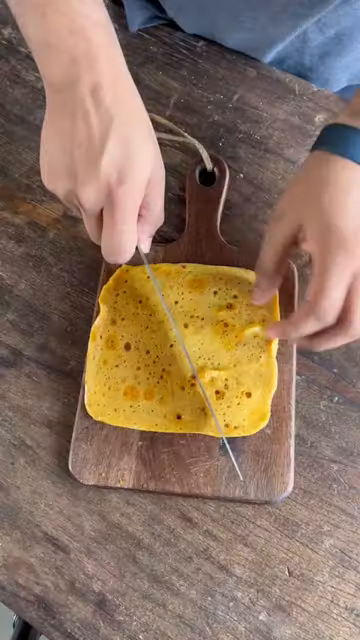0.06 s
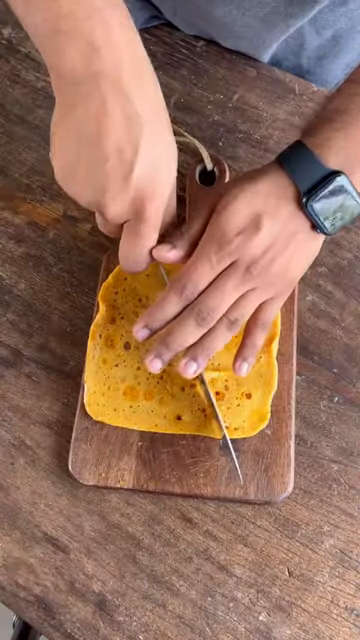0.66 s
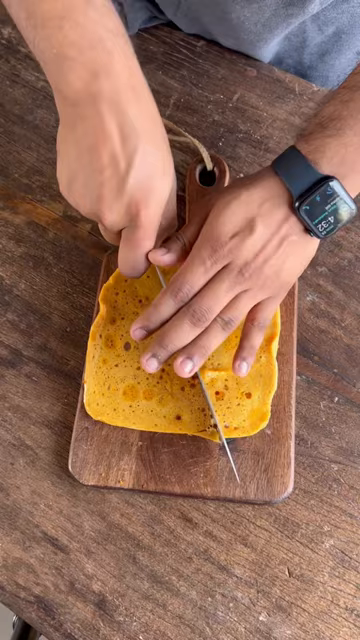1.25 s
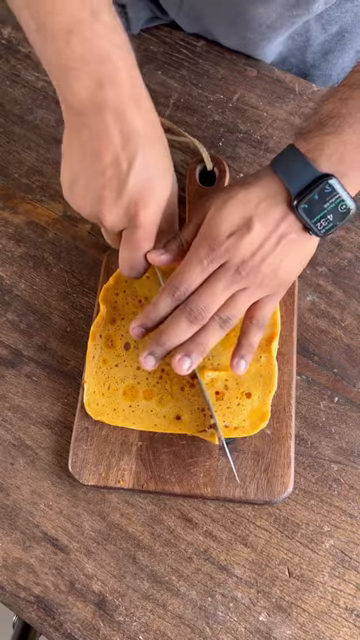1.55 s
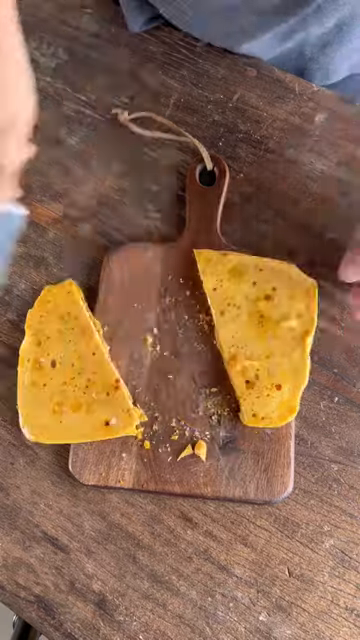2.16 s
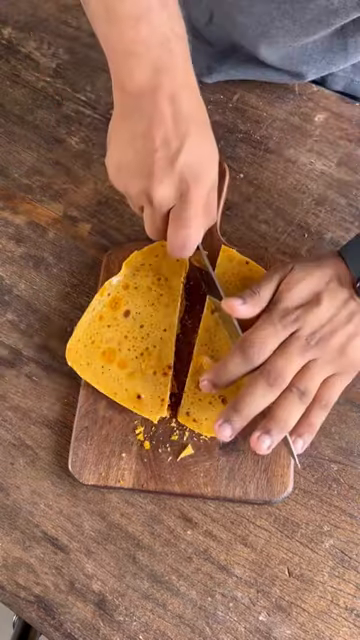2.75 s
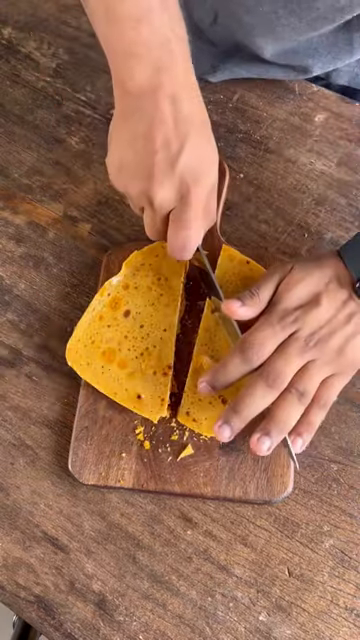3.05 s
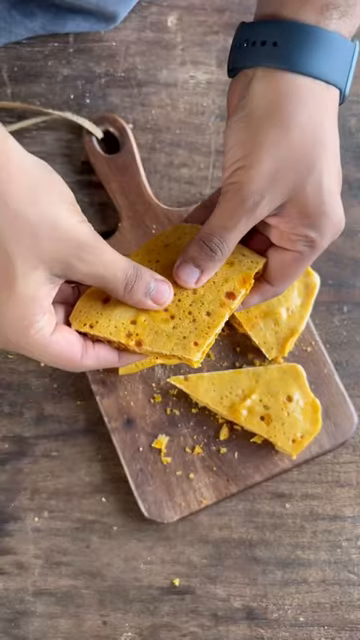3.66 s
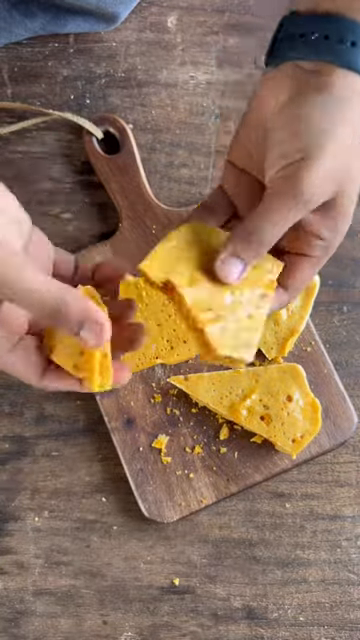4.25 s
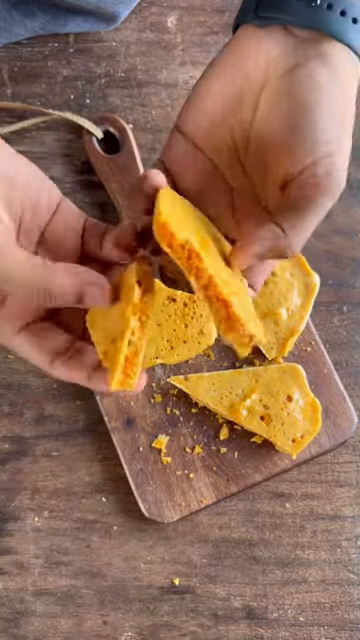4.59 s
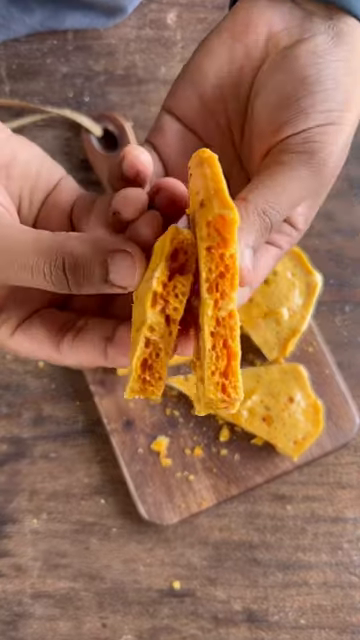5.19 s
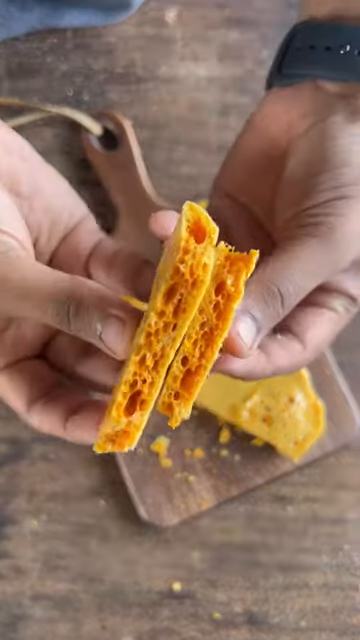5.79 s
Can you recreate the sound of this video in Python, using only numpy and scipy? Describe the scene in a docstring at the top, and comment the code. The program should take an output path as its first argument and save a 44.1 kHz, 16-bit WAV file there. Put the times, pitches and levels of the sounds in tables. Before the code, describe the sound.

A knife presses into brittle honeycomb toffee on a wooden board, making dry, crackly crunches and dull thuds that build to a sharp crack and a short skid of shards. After a few light scrapes, a second, quicker cut crunches and cracks. Then fingers snap a piece with a smaller, crisp sound and softly handle it. Everything is heard close up in a small kitchen over faint hiss.

```python
"""Honeycomb toffee crunches under a knife on a wooden board, then a piece is snapped by hand.
Sugar cells collapse in avalanches of tiny clicks that ring the slab; it grinds under load, cracks,
and sends shards skidding, with light scrapes and clinks in between. Each push thuds through board
and table. Underneath sit a low rumble of hands and a faint hiss, all heard close up in a small
kitchen, with a wide top end."""
import sys
import numpy as np
from scipy import signal
from scipy.fft import rfft, irfft, next_fast_len
from scipy.io import wavfile
from scipy.ndimage import uniform_filter1d

SR = 44100
rng = np.random.default_rng(int(sys.argv[2]) if len(sys.argv) > 2 else 0)


def to_wav(sig):
    """Store sig (one row per channel, or 1-D mono) as 16-bit WAV at the path in sys.argv[1].

    Samples outside -1..1 are clipped; the rate is SR.
    """
    pcm = np.clip(np.atleast_2d(sig), -1, 1) * 32767
    pcm = np.round(pcm).astype(np.int16)
    wavfile.write(sys.argv[1], SR, pcm.T)  # frames by channels


N = 265923
TIME = np.arange(N) / SR
LEFT_RIGHT = np.array([[1], [-1]])  # opposite signs on the two channels

# the big bursts of collapsing cells: (peak time [s], swell [s], level [dB])
CRUNCHES = [(0.691, 0.0038, -45), (0.735, .006, -52), (0.917, 0.0046, -45), (0.946, 0.0082, -44.5),
            (0.984, 0.015, -42), (1.121, 0.0076, -46.5), (1.184, .012, -53.5), (1.279, 0.016, -38),
            (1.32, 0.011, -48), (1.398, .012, -47), (1.461, 0.012, -37.5), (1.519, 0.0058, -45.5),
            (1.602, 0.0048, -44.5), (1.621, 0.0091, -41), (1.639, 0.014, -35.5), (1.72, 0.012, -41),
            (1.755, 0.0052, -32.5), (2.616, 0.0034, -51), (2.636, 0.0063, -40.5), (2.681, 0.013, -41),
            (2.722, 0.0097, -43), (2.752, 0.0047, -29.5), (2.771, 0.0061, -38.5), (2.821, 0.0052, -43.5),
            (2.918, .005, -33), (2.935, 0.012, -30), (2.968, 0.0079, -28), (3.022, 0.0071, -30),
            (3.067, 0.0046, -35.5), (3.548, 0.0039, -56), (3.622, 0.002, -65), (3.679, 0.0027, -72.5),
            (3.737, .004, -76), (3.767, 0.003, -58.5), (3.827, 0.0025, -71.5)]
# cracks through the slab; hollow, crisp, ring and thump are set against the crack's mids:
# (peak time [s], swell [s], level [dB], hollow [dB], crisp [dB], ring [Hz], ring [dB], thump [dB])
SNAPS = [(0.595, 0.0032, -28.5, -8.5, -2.5, 1840, -27, -31),
         (.999, 0.0036, -27.5, -11, -4.5, 507, -3.5, -2.5),
         (1.773, 0.0023, -14.5, -0.5, -10, 867, -8.5, -3), (3.101, 0.0026, -15, -8, -14.5, 1398, -9, -22.5),
         (3.946, 0.0029, -28.5, -6.5, -1, 1475, -17.5, -7)]
# a piece under stress, twice beneath the knife and once between the fingers:
# (start [s], end [s], grind at start [dB], grind at end [dB], hollow [dB], crisp [dB])
LOADS = [(0.601, 1.77, -61, -53.5, -3.5, 1), (2.597, 3.09, -60.5, -53, -4, -3.5),
         (3.54, 3.94, -83, -85.5, -10.5, 15.5)]
# freed shards sliding: (start [s], length [s], level [dB], fade [dB], crisp [dB])
SKIDS = [(0.605, 0.17, -60.5, 13, 16.5), (1.006, 0.16, -40, 23, -2), (1.785, .18, -34, 26, -30.5),
         (3.107, .085, -33.5, 13.5, -18.5), (3.196, 0.12, -49, 2, -12)]
# blade or pieces graze the sugar: (peak time [s], swell [s], level [dB], crisp [dB])
BRUSHES = [(0.065, 0.0038, -46, -15), (0.25, 0.0027, -61, -2), (0.339, 0.0092, -45.5, -1),
           (0.51, 0.034, -60.5, -1), (0.848, 0.0074, -52.5, -10), (2.303, 0.0039, -36, -13),
           (2.416, 0.0072, -54.5, -9), (2.49, 0.0037, -37.5, -7), (2.546, 0.016, -52, -5.5),
           (3.43, 0.0024, -69.5, 14), (4.114, 0.013, -54, 4), (4.15, .006, -59.5, 4),
           (4.31, .011, -67.5, 7.5), (4.624, 0.0026, -63, 2.5), (5.07, 0.02, -67.5, -15),
           (5.73, .002, -62.5, -5)]
# blade or shard touches a piece: (time [s], level [dB], pitch [Hz], t60 [s])
CLINKS = [(2.302, -49, 2905, 0.29), (5.108, -52, 2890, 0.028)]
# resonances of slab and blade: (frequency [Hz], sharpness [Q], level [dB])
SLAB_MODES = [(800, 10, -5), (928, 29, -3.5), (1144, 13, -1), (1450, 5.6, -10), (1669, 4.3, -0.5),
              (2373, 4.2, -6), (2720, 36, -1.5), (3250, 40, -4.5), (3830, 26, -4.5), (4120, 30, -3),
              (5710, 61, 2), (6310, 8, -2.5), (7300, 18, -8)]
# tone of breaking sugar: (frequency [Hz], gain [dB])
SUGAR_EQ = [(250, 0.5), (700, -4.5), (2500, 0), (4000, -6.5), (5000, -3.5), (5600, -8), (8000, -9),
            (10000, -13.5), (11900, -9), (12700, -37), (16000, -41)]
# blade or hand loads the board: (time [s], level [dB], hardness as upper-mode boost [dB])
KNOCKS = [(0.059, -40, 5), (0.352, -41, -2), (0.597, -45.5, 16), (0.845, -46.5, -4.5), (0.998, -28, -4),
          (1.047, -35, -9), (1.12, -41.5, 0), (1.272, -33, -16.5), (1.388, -45.5, -2), (1.456, -39, -1.5),
          (1.475, -34, -6), (1.615, -40.5, 0), (1.72, -36, -2), (1.77, -27, 1), (2.308, -39, -0.5),
          (2.674, -50.5, 10), (2.753, -38, 3), (2.919, -37, -5), (2.967, -32.5, 3.5), (3.017, -27.5, -9.5),
          (3.096, -34.5, 20), (3.943, -52.5, 7.5), (4.606, -46.5, -15), (4.673, -45.5, -27.5)]
# resonances of the board on the table: (frequency [Hz], level [dB], t60 [s])
TABLE_MODES = [(60, -19, 0.23), (103, -10.5, 0.15), (117, 2.5, 0.15), (162, -5, 0.32), (208, -5.5, 0.13),
               (242.6, -3.5, 0.15), (295, -11.5, 0.35), (353, -15, 0.09), (398, -15, 0.089),
               (554, -15.5, 0.14), (716, -19.5, 0.12)]
# partials of a faint hollow ring: (frequency [Hz], level [dB])
HOLLOW_PARTIALS = [(135, -60.5), (275, -69.5), (425, -66.5), (546, -63.5), (707, -72.5), (945, -84.5)]
# hands shift over the table: (peak time [s], swell [s], level [dB])
HAND_MOVES = [(0.3, 0.47, -58.5), (1.82, 0.088, -39.5), (2.45, 0.083, -55.5), (3.229, 0.075, -45),
              (4.05, 0.061, -50), (4.7, 0.12, -54), (5.09, 0.077, -54.5), (5.551, 0.052, -51),
              (6.0, 0.25, -58)]
# tone of the hand rumble: (frequency [Hz], gain [dB])
HAND_EQ = [(15, -46.5), (25, -14), (85, -2.5), (123, -8.5), (158, -7.5), (233, -10), (458, -20.5),
           (517, -32.5), (574, -39.5), (900, -47), (1170, -71), (1980, -120)]
# wall reflections by band: (low edge [Hz], high edge [Hz], level [dB], side against mid [dB])
KITCHEN_BANDS = [(191.4, 300, -8, -10.5), (396, 720, 0, -4), (720, 3100, -13, -4.5),
                 (3240, 9600, -11, -6.5)]
# left-right phase shift that widens the treble: (frequency [Hz], lead of the left [rad])
STEREO_PHASE = [(0, 0), (2800, 0), (4150, 0.8), (4900, -2), (5350, -6.5), (7300, -6), (9500, -8),
                (12500, -9.0)]
# level of the hiss over time: (time [s], level [dB])
HISS_LEVELS = [(0, -71.5), (1.7, -64.5), (2.0, -82), (2.28, -73), (3.3, -69.5), (3.4, -71), (4.5, -68.5),
               (6.03, -67)]
# tone of the centred hiss: (frequency [Hz], gain [dB])
HISS_EQ = [(290, -36), (500, -5.5), (873, -16.5), (976, -13.5), (1360, -16.5), (1640, -2.5), (1930, 1),
           (2070, -1.5), (2350, -14.5), (3020, -18.5), (3720, -16), (4220, -21), (5980, -21), (7790, -32.5),
           (14000, -47.5)]
# tone of the room noise that differs left and right: (frequency [Hz], gain [dB])
DIFFUSE_EQ = [(24, -44.5), (40, -13), (123, 0.5), (479, -4.5), (527, -4), (1400, -15), (3310, -10.5),
              (4000, -19), (7450, -34.5), (12000, -28), (15600, -56), (22000, -120)]
# thin tones in the hiss: (frequency [Hz], level against the hiss [dB])
WHINE_TONES = [(2622, -22), (3215, -18.5), (3429, -23), (3628, -23)]
# brief dips of the whole mix: (start [s], end [s], depth [dB])
DROPOUTS = [(2.279, 2.293, -21.5), (2.652, 2.666, -32), (3.319, 3.36, -26.5), (5.626, 5.638, -22)]


def crunches():
    """Cells cave in under blade or fingers; the nearest load sets how hollow and crisp they sound."""
    out = np.zeros(N)
    for time_s, swell_s, db in CRUNCHES:
        *_, hollow_db, crisp_db = min(LOADS, key=lambda load: abs(time_s - (load[0] + load[1]) / 2))
        sound, peak_s = burst(swell_s, db, hollow_db, crisp_db - dulling(db), crumble_db=-16)
        add(out, sound, time_s - peak_s)
    return out


def burst(swell_s, db, hollow_db, crisp_db, crumble_db, crumble_s=0.03):
    """One avalanche with a tail of trickling crumbs; returns the sound and its peak time."""
    envelope, peak_s = avalanche(swell_s, fall=1.0, size=12288, peak_sample=4096)
    since_peak = TIME[:len(envelope)] - peak_s
    crumbs = undb(crumble_db) * (since_peak > 0) * np.exp(-np.abs(since_peak) / crumble_s)
    envelope = np.maximum(envelope, crumbs)
    clicks = cells(envelope, per_s=2800, spread_db=-0.5)
    return undb(db) * slab(clicks, envelope, hollow_db, crisp_db), peak_s


def avalanche(swell_s, fall, size=8192, peak_sample=2048):
    """Each break sets off more until the stress is spent; returns the envelope and its peak time."""
    t = (np.arange(size) - peak_sample) / SR
    distance = t / (swell_s * np.where(t < 0, 1, fall))
    return np.exp(0.5 - np.hypot(distance, 0.5)), peak_sample / SR  # exponential flanks, rounded top


def cells(envelope, per_s, spread_db):
    """Sugar walls break at random moments, each a single click of its own strength."""
    breaks = rng.random(len(envelope)) < per_s / SR
    strength = undb(spread_db * np.minimum(rng.exponential(size=len(envelope)), 3))
    return envelope * breaks * strength * rng.choice([-1, 1], len(envelope))


def slab(clicks, envelope, hollow_db, crisp_db, direct_db=-1, walls_db=1, wall_q=28, wall_count=7):
    """Clicks ring the slab and nearby cell walls; hollow and crisp set lows and highs against mids."""
    min_width_hz = 55  # foamy sugar is well damped
    modes = sum(undb(db) * resonate(clicks, hz, max(hz / q, min_width_hz)) for hz, q, db in SLAB_MODES)
    # walls differ in size, so every break has its own few pitches
    wall_hz = 1000 * 2 ** ((np.arange(wall_count) + rng.random(wall_count)) / 2)
    walls = sum(resonate(clicks, hz, max(hz / wall_q, min_width_hz)) for hz in wall_hz)
    body = equalise(undb(direct_db) * clicks + modes + undb(walls_db) * walls, SUGAR_EQ)
    hollow = undb(hollow_db) * unit(band(body, 310, 1200))
    mids = unit(band(body, 1100, 3900))
    crisp = undb(crisp_db) * unit(band(body, 4700, 15000))
    return (hollow + mids + crisp) * rms(envelope)


def dulling(level_db, typical_db=-43, db_per_db=0.1819):
    """Crispness lost, in dB: a bigger burst breaks bigger walls and sounds darker."""
    return db_per_db * (level_db - typical_db)


def snaps(fizz_db=-29):
    """A crack races through the cells, stops short, jolts the board and rings the freed piece."""
    out = np.zeros(N)
    for time_s, swell_s, db, hollow_db, crisp_db, ring_hz, ring_db, thump_db in SNAPS:
        envelope, peak_s = avalanche(1.42 * swell_s, fall=0.88)
        clicks = whiten(cells(envelope, per_s=14000, spread_db=5.0))
        # a full break mostly radiates directly, and is sharp enough to fizz at the very top
        crack = slab(clicks, envelope, hollow_db, crisp_db, direct_db=5, walls_db=-8.5)
        fizz = undb(fizz_db) * unit(band(clicks, 14000, 16000))
        ring = undb(ring_db) * unit(resonate(resonate(clicks, ring_hz, 250), ring_hz, 690))
        thump = undb(thump_db) * unit(band(clicks, 110, 480))
        snap = crack + (ring + thump + fizz) * rms(envelope)
        add(out, undb(db + 2.5) * snap, time_s - peak_s)
    return out


def grinding(bursts_per_s=51, spread_db=3, steady_rasp=0.31, size=65536):
    """Under load, weak cells keep giving way: small random bursts over an even rasp."""
    out = np.zeros(N)
    grain, _ = avalanche(swell_s=0.0023, fall=1.3)
    for start_s, end_s, start_db, end_db, hollow_db, crisp_db in LOADS:
        triggers = (rng.random(size) < bursts_per_s / SR) * undb(spread_db * rng.standard_normal(size))
        flutter = unit(steady_rasp + unit(signal.fftconvolve(triggers, grain, mode="same")))
        envelope = flutter * load_ramp(start_s, end_s, start_db, end_db)[int(start_s * SR):][:size]
        clicks = cells(envelope, per_s=1200, spread_db=0.5)
        crisp_db -= dulling((start_db + end_db) / 2)
        add(out, slab(clicks, envelope, hollow_db, crisp_db), start_s)
    return out


def load_ramp(start_s, end_s, start_db, end_db):
    """Grind level of a stressed piece: a straight ramp in dB, cut off at the break."""
    return undb(np.interp(TIME, [start_s, end_s], [start_db, end_db])) * (TIME > start_s) * (TIME < end_s)


def skids(edge_s=0.0044, hollow_db=-0.5):
    """Rough shards catch and slip in a fading stream of tiny clicks."""
    out, t = np.zeros(N), TIME[:SR // 2]
    for start_s, length_s, db, fade_db, crisp_db in SKIDS:
        gate = np.clip(np.minimum(t, length_s - t) / edge_s + 0.5, 0, 1)
        envelope = undb(-fade_db * t / length_s) * gate
        clicks = cells(envelope, per_s=1200, spread_db=3.5)
        add(out, undb(db) * slab(clicks, envelope, hollow_db, crisp_db), start_s)
    return out


def brushes():
    """Short scrapes as the blade is placed and the pieces are turned over."""
    out = np.zeros(N)
    for time_s, swell_s, db, crisp_db in BRUSHES:
        hollow_db = -9 - 0.53 * crisp_db  # a duller touch sounds more hollow
        sound, peak_s = burst(swell_s, db, hollow_db, crisp_db, crumble_db=-15)
        add(out, sound, time_s - peak_s)
    return out


def clinks(spread=0.13, count=10):
    """A light touch on a piece rings a cluster of close modes."""
    out, t = np.zeros(N), TIME[:SR // 4]
    for time_s, db, hz, t60 in CLINKS:
        offsets = np.linspace(-1, 1, count) + rng.uniform(-1, 1, count) / count
        cluster_hz = hz * (1 + spread * offsets)
        modes = np.sin(2 * np.pi * cluster_hz[:, None] * t)
        ring = rng.choice([-1, 1], count) @ modes / np.sqrt(count / 2)
        add(out, undb(db) * ring * decay(t, t60), time_s)
    return out


def knocks(upper_from_hz=130, contact_s=0.0009, settle_s=0.0024, rebound_s=0.042, rebound_db=-8):
    """Each push thuds through board and table, then the board rocks back; hard contact is brighter."""
    out, t = np.zeros(N), TIME[:SR // 3, None]
    hz, mode_db, t60 = np.transpose(TABLE_MODES)
    upper = np.clip(np.log2(hz / upper_from_hz) * 2, 0, 1)  # 0 for table modes, 1 for board modes
    # the light board speaks at once, the heavy table has a slower attack
    attack_s = contact_s + settle_s * (1 - upper)
    envelope = (1 - np.exp(-t / attack_s)) * decay(t, t60)
    rebounds = [(time_s + rebound_s, db + rebound_db, hard_db) for time_s, db, hard_db in KNOCKS]
    for time_s, db, hard_db in KNOCKS + rebounds:
        # the hand's load shifts the board's modes, not the table's
        detune, level_jitter = rng.standard_normal((2, len(hz))) * upper
        gains = undb(mode_db + hard_db * upper + 1.5 * level_jitter)
        modes = gains * np.sin(2 * np.pi * hz * (1 + 0.031 * detune) * t)
        thud = (modes * envelope) @ rng.choice([-1, 1], len(hz))
        add(out, undb(db + 0.5) * thud / np.std(thud[:SR // 40]), time_s)
    return out


def hollow_ring(start_s=3.345, length_s=0.14):
    """A faint hollow ring swells and fades."""
    progress = np.clip((TIME - start_s) / length_s, 0, 1)
    partials = sum(undb(db) * wavering_tone(hz, depth=0.00603) for hz, db in HOLLOW_PARTIALS)
    return np.sin(np.pi * progress ** 0.5) * partials


def hands(resting_db=-65.5, above_grind_db=4, table_db=-2):
    """Hands rumble and set the table's main mode humming, louder as they press or shift."""
    rub = unit(equalise(rng.standard_normal(N), HAND_EQ))
    table_hum = undb(table_db) * unit(resonate(rub, hz=120, width_hz=6.7))
    pressing = undb(above_grind_db) * sum(load_ramp(*load[:4]) for load in LOADS)
    shifting = sum(undb(db) * np.exp(-((TIME - peak_s) / swell_s) ** 2 / 2)
                   for peak_s, swell_s, db in HAND_MOVES)
    return unit(rub + table_hum) * np.sqrt(undb(resting_db) ** 2 + pressing ** 2 + shifting ** 2)


def kitchen(send, t60_s=0.32, build_s=0.0016):
    """Short, dense stereo reverb off the walls, narrowest in the bass."""
    t = TIME[:SR // 2]
    mid, side = rng.standard_normal((2, len(t)))
    tail = decay(t, t60_s) * (1 - np.exp(-t / build_s))
    response = 0
    for lo_hz, hi_hz, db, side_db in KITCHEN_BANDS:
        noise = mid + undb(side_db) * side * LEFT_RIGHT
        response += undb(db) * band(noise * tail, lo_hz, hi_hz) / np.linalg.norm(tail)
    return signal.fftconvolve(send[None], response, axes=1)[:, :N]


def hiss(diffuse_db=-5.5):
    """A bed of thin hiss with a faint whine in the centre and diffuse room noise at the sides."""
    mid = unit(equalise(rng.standard_normal(N), HISS_EQ))
    side = undb(diffuse_db) * unit(equalise(rng.standard_normal(N), DIFFUSE_EQ))
    whine = sum(undb(db) * wavering_tone(hz, depth=0.002) for hz, db in WHINE_TONES)
    hiss_level = undb(np.interp(TIME, *np.transpose(HISS_LEVELS)))
    return hiss_level * (mid + whine + side * LEFT_RIGHT)


def wavering_tone(hz, depth):
    """A tone of rms 1 whose pitch wanders slowly."""
    drift = unit(uniform_filter1d(rng.standard_normal(N), 4000))
    return np.sqrt(2) * np.sin(2 * np.pi * np.cumsum(hz * (1 + depth * drift)) / SR)


def widen_treble(x):
    """A left-right phase shift that widens the treble."""
    size = next_fast_len(N + SR // 10)
    phase = np.interp(np.fft.rfftfreq(size, 1 / SR), *np.transpose(STEREO_PHASE))
    return irfft(rfft(x, size) * np.exp(0.5j * phase * LEFT_RIGHT), size)[:, :N]


def undb(db):
    """Decibels to gain."""
    return 10 ** (np.asarray(db) / 20)


def rms(x):
    """Average level, never quite zero."""
    return np.sqrt(np.mean(x ** 2) + 1e-20)


def unit(x):
    """Scale to rms 1."""
    return x / rms(x)


def decay(t, t60):
    """A tail that falls 60 dB in t60 seconds."""
    return np.exp(-np.log(1000) * t / t60)


def add(track, sound, start_s):
    """Mix a sound into the track, trimming any overhang."""
    i = int(start_s * SR)
    sound, i = sound[max(-i, 0):], max(i, 0)
    track[i:i + len(sound)] += sound[:N - i]


def band(x, lo_hz, hi_hz):
    """Causal band-pass."""
    return signal.sosfilt(signal.butter(3, [lo_hz, hi_hz], "band", fs=SR, output="sos"), x)


def resonate(x, hz, width_hz):
    """One resonance, gain 1 at its centre."""
    return signal.lfilter(*signal.iirpeak(hz, hz / width_hz, fs=SR), x)


def equalise(x, points):
    """Apply an EQ curve of (frequency [Hz], gain [dB]) points."""
    hz, db = np.transpose(points)
    bin_hz = np.maximum(np.fft.rfftfreq(len(x), 1 / SR), 1)
    return irfft(rfft(x) * undb(np.interp(np.log(bin_hz), np.log(hz), db)), len(x))


def whiten(clicks, smooth_bins=45):
    """Spread a burst's energy evenly over frequency."""
    spectrum = rfft(clicks)
    power = uniform_filter1d(np.abs(spectrum) ** 2, smooth_bins)
    return irfft(spectrum / np.sqrt(np.abs(power) + 1e-12), len(clicks))


def scene(crack_send_db=-1.0, thud_send_db=-14):
    """Toffee and table up front, the kitchen around them, hands and hiss underneath."""
    crumble = crunches() + grinding() + brushes() + clinks() + skids()
    cracks, thuds = snaps(), knocks()
    # the snaps get slightly less reverb, so their tails are quieter
    room = kitchen(crumble + undb(crack_send_db) * cracks + undb(thud_send_db) * thuds)
    return widen_treble(crumble + cracks + thuds + room + hollow_ring()) + hands() + hiss()


def record(dry):
    """Master chain: soft-clipped peaks, a few brief dropouts and a steep high cut."""
    ceiling, high_cut_hz = 0.94, 15900
    rounded = ceiling * np.tanh(dry / ceiling)
    gate_db = sum(depth_db * ((TIME > start) & (TIME < end)) for start, end, depth_db in DROPOUTS)
    gate = uniform_filter1d(undb(gate_db), size=90)
    high_cut = signal.ellip(8, 0.2, 80, high_cut_hz, fs=SR, output="sos")
    return signal.sosfilt(high_cut, gate * rounded)


dry = scene()
out = record(dry)
to_wav(out)
```